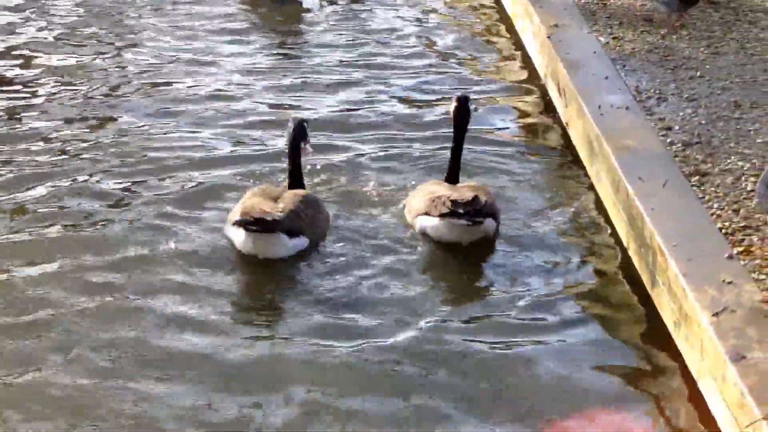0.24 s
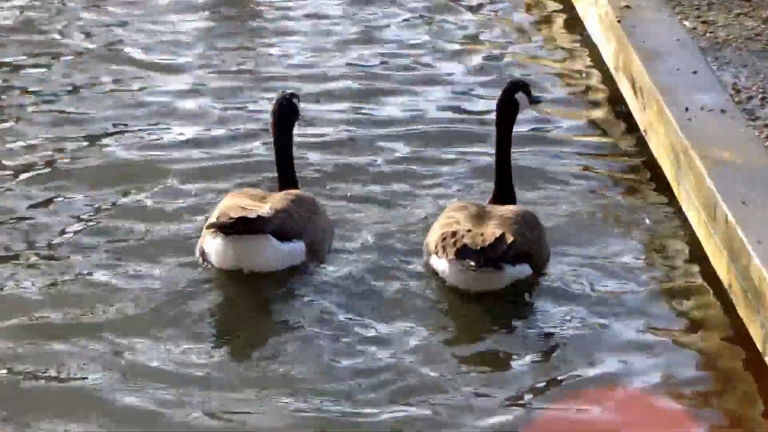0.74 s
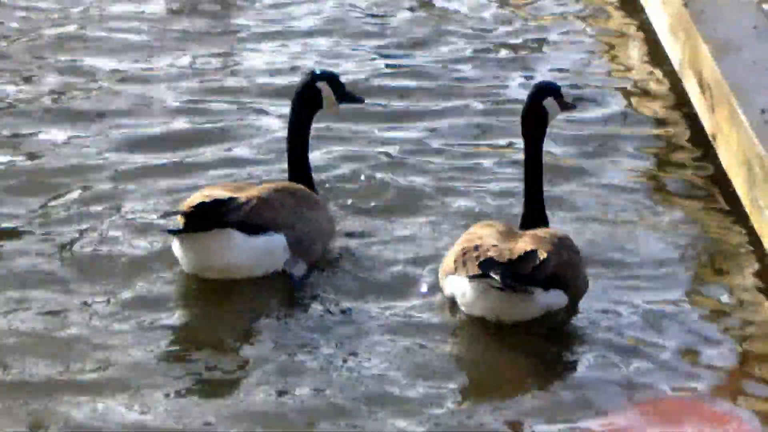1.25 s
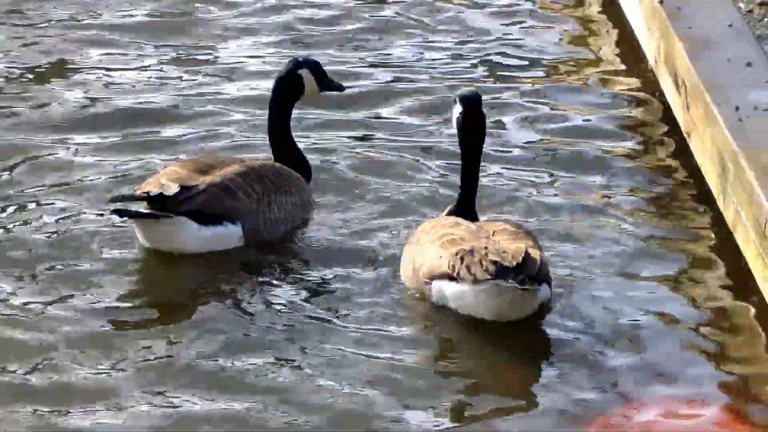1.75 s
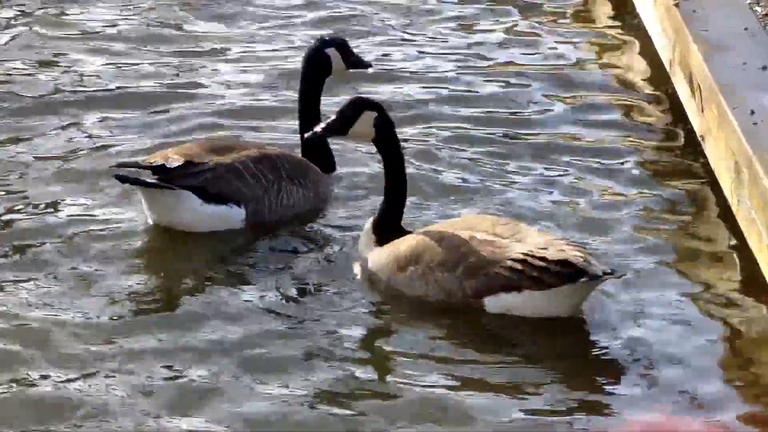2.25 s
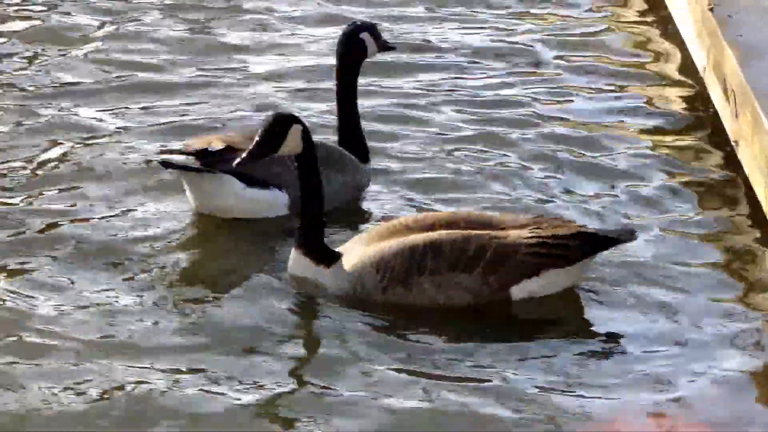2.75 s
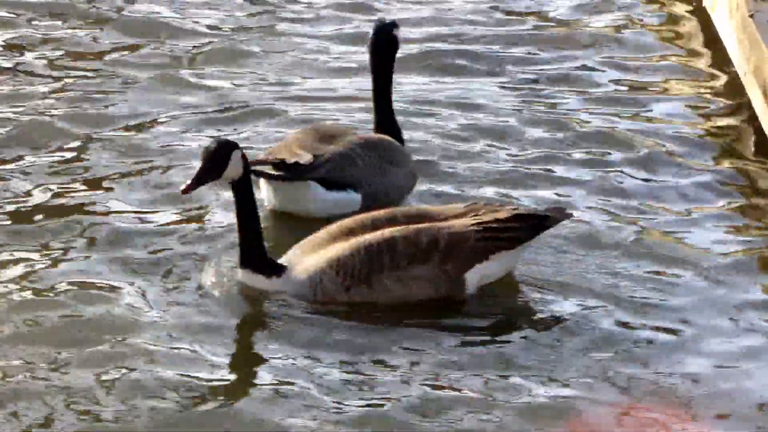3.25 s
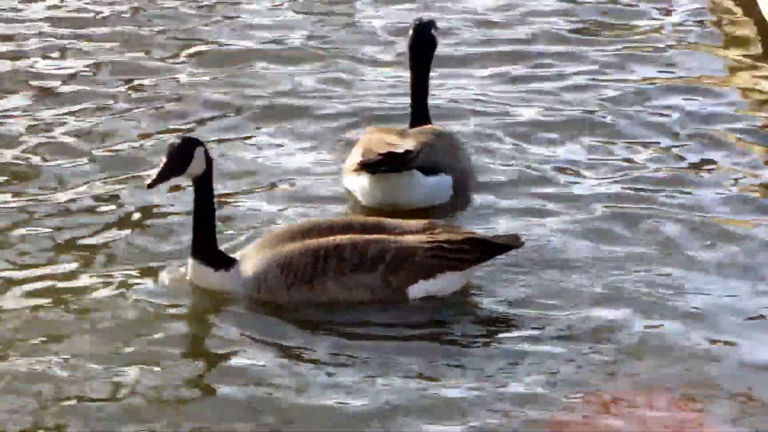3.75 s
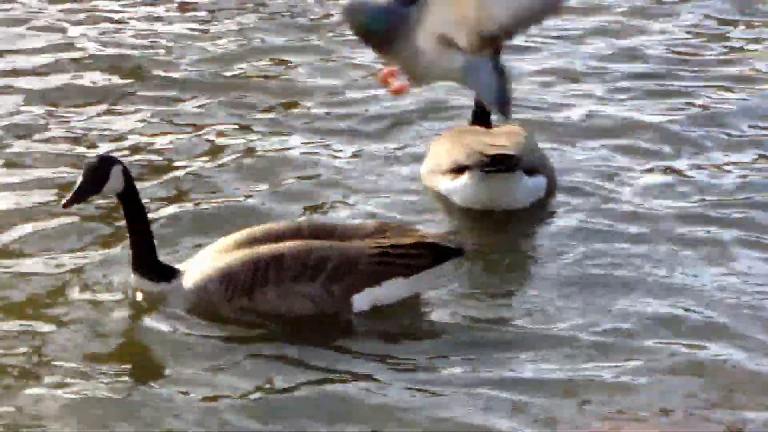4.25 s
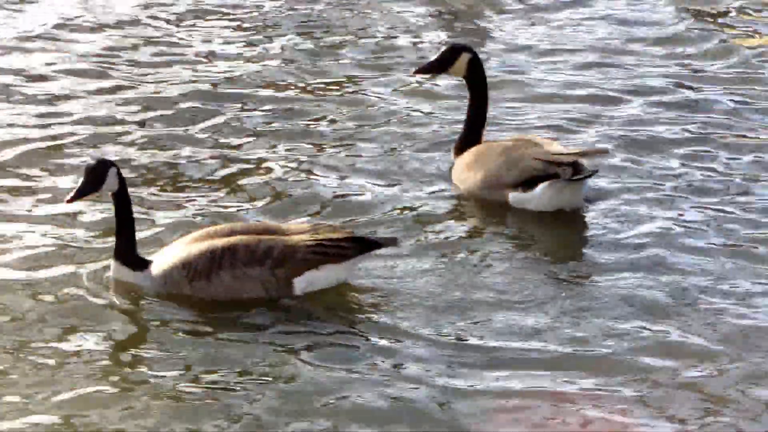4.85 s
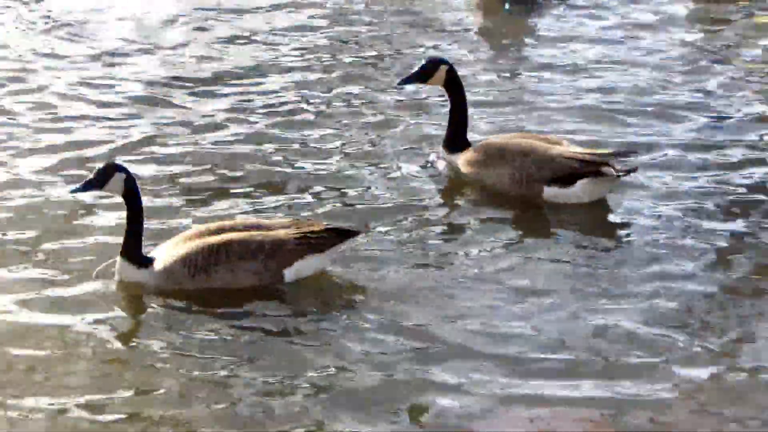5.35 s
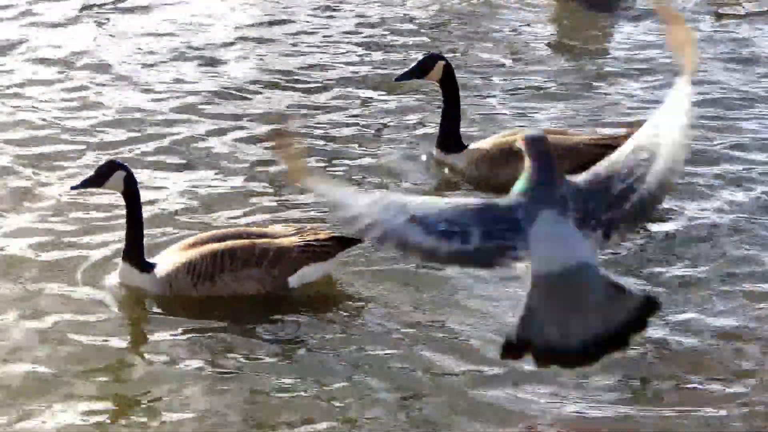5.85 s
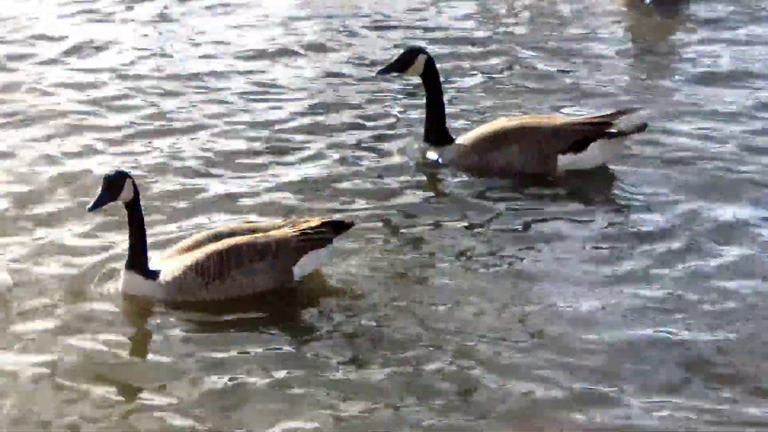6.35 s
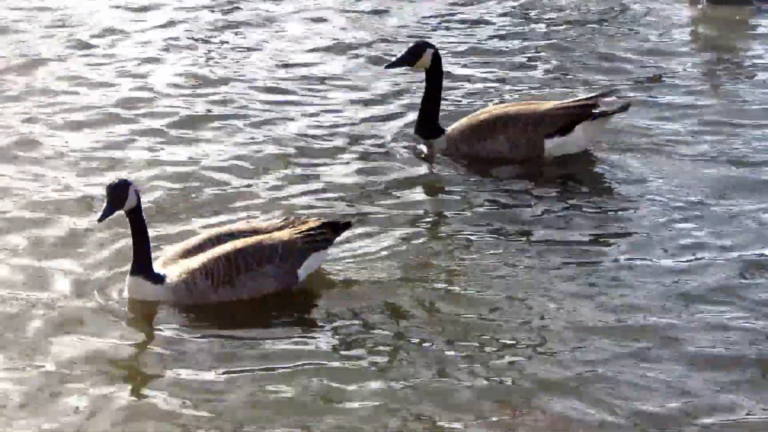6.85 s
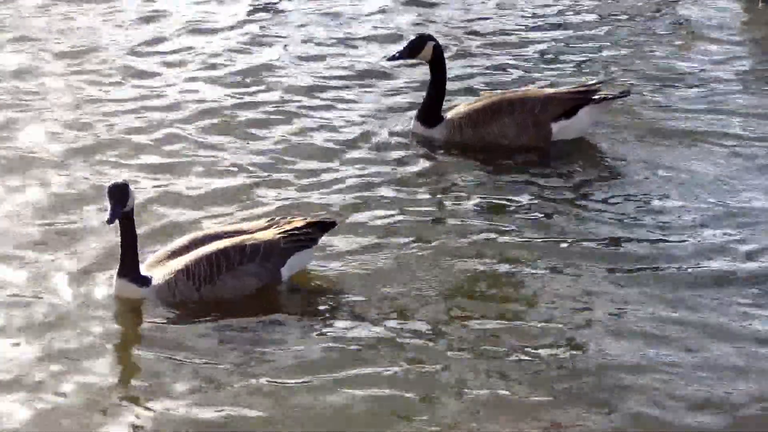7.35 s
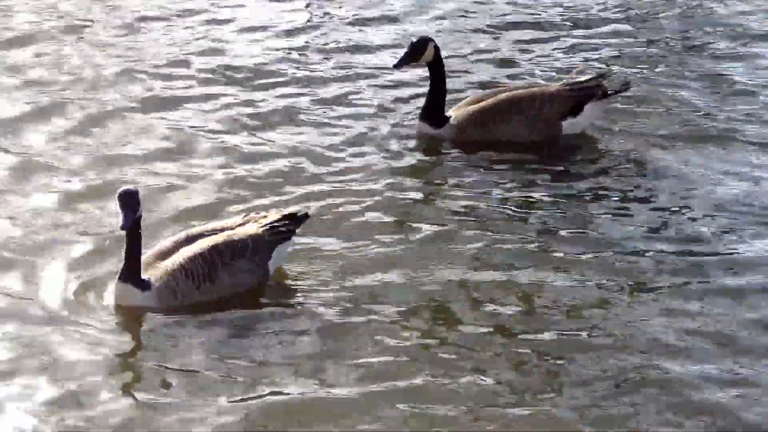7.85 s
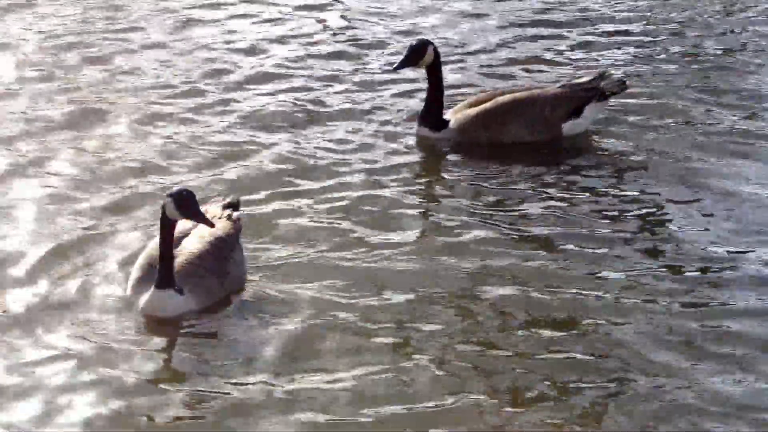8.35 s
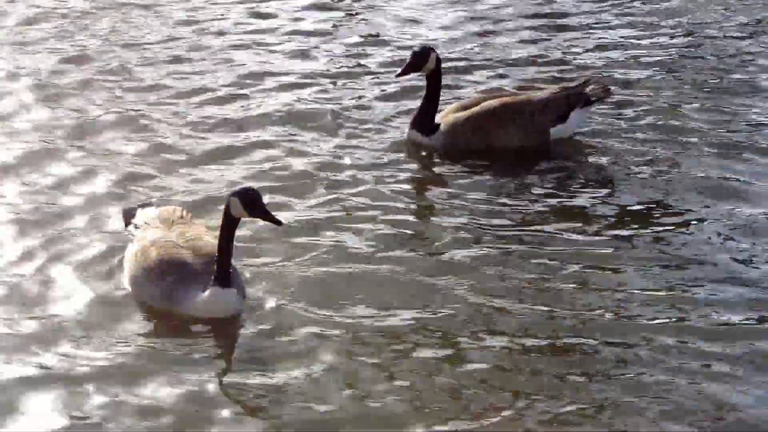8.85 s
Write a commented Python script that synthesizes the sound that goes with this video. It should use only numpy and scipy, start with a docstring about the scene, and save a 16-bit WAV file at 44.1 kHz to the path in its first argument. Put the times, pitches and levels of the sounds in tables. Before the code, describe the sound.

A close, dry outdoor sound of gravel under slow, shuffling feet on a path by a pond. From 0 to 1.5 seconds, light grinding and short gritty slips come quietly, with soft low bumps and tiny instants of silence. From about 1.6 the crunching thickens into irregular bursts, with sharp pebble clicks and hollow stone knocks near 2.5. A faint, hoarse pigeon coo lies behind at 2.5 to 3.1. Steady uneven crunching continues, with a bright snap at 3.9. From 4.8 it swells, loudest around 5.2 to 6, with heavy crunches, crackling hard snaps and a dull low thump near 5.6. After 6.5 it thins; a hollow knock and crunch come at 7.2, then light scrapes. After 8 only sparse ticks and slips remain over very faint open air, with a brief dropout near 8.9.

```python
"""Gravel crunches and shifts under slow feet on a pond-side path, close to the microphone.
Dense tiny contacts make the grinding; each slip is a short burst of grit that rings in the stones.
Single pebbles snap as hard clicks with brief chatter, loudest past the middle; large stones knock hollow.
Behind them are soft low bumps of filtered pushes, a faint pigeon's wavering tone and noise for the open air.
The sound cuts out for an instant a few times."""
import sys
import numpy as np
from scipy import signal
from scipy.io import wavfile
from scipy.ndimage import uniform_filter1d

SR = 44100
rng = np.random.default_rng(int(sys.argv[2]) if len(sys.argv) > 2 else 0)


def persist_wave(psi):
    """Save psi, clipped to +-1, as 16-bit WAV."""
    counts = np.round(np.clip(psi, -1, 1) * 32767).astype(np.int16)
    wavfile.write(sys.argv[1], SR, np.atleast_2d(counts).T)


N = 400869
TAPS = 2048  # filter length in samples
HZ = np.fft.rfftfreq(TAPS, 1 / SR)
TIME = np.arange(N) / SR
EDGE_HZ = 15900  # upper band limit

# relative colour of a pebble's snap and of small ticking chips: hz, density_db (dB per Hz)
SNAP_COLOUR = [(100, -16), (400, -20), (1100, -14), (4500, -6), (6500, -4.5), (9000, 0.5), (12000, -8.5),
               (16000, -8.5)]


def amp(db):
    """Amplitude factor for a level in dB."""
    return 10 ** (np.asarray(db) / 20)


def evened(x):
    """Scale to unit mean square."""
    return x / np.sqrt(np.mean(x ** 2) + 1e-20)


def colour(points):
    """Gain at each frequency from (Hz, dB) points, joined along log frequency."""
    hz, db = np.transpose(points)
    return amp(np.interp(np.log(HZ + 1), np.log(hz), db))


def add(mix, s, sound):
    """Add a sound into the mix from time s, cut off at the end."""
    part = mix[max(round(s * SR), 0):][:len(sound)]
    part += sound[:len(part)]


def filtered(x, gain):
    """Minimum-phase filter with the given gain: sharp attack, ringing afterwards."""
    log_gain = np.log(np.maximum(gain, 1e-5))
    circle = np.concatenate([log_gain, log_gain[-2:0:-1]])
    spectrum = np.exp(np.conj(signal.hilbert(circle)))
    return signal.oaconvolve(x, np.fft.ifft(spectrum).real)


def wander(length, step):
    """Random curve of unit mean square, with straight lines between knots every step points."""
    knots = np.arange(0, length + step, step)
    return evened(np.interp(np.arange(length), knots, rng.standard_normal(len(knots))))


def ring(hz, width, lift_db):
    """A resonance as a bump in gain (a hollow if negative); width is a share of its frequency."""
    return amp(lift_db / (1 + ((HZ - hz) / (width * hz / 2)) ** 2))


def grit(length, per_s, spread_db):
    """Tiny stone contacts: clicks at random moments, mostly small, a few large."""
    chance = rng.random(length)
    size = rng.exponential(1, length)
    sign = rng.choice([-1., 1.], length)
    return evened(sign * (chance < per_s / SR) * amp(spread_db * np.minimum(size, 4)))


def slip(length, onset=0.35, fall=0.86):
    """Quick swell and slower decay of one slip, peak 1; a smaller onset is more sudden."""
    u = np.arange(int(6 * length * SR) + 2) / (length * SR)
    swell = u ** abs(onset) * np.exp(-fall * u)
    return swell / swell.max()


def patchy(x, depth_db, size=512):
    """Ever new stones are in contact, so the colour changes in small patches of time and frequency."""
    overlap = size * 3 // 4
    z = signal.stft(x, nperseg=size, noverlap=overlap)[2]
    patches = uniform_filter1d(rng.standard_normal(z.shape), size=7, axis=0)
    patches = uniform_filter1d(patches, size=10, axis=1)
    return signal.istft(z * amp(depth_db * evened(patches)), nperseg=size, noverlap=overlap)[1][:len(x)]


def air(level_db=-59.0):
    """Faint steady outdoor noise: random pressure shaped by one fixed colour."""
    # relative colour of the open air: hz, density_db (dB per Hz)
    air_colour = [(10, 8.5), (25, 2.5), (60, -5), (120, -12.5), (220, -8.5), (310, -10), (450, 0.5),
                  (700, -8.5), (1500, -13.5), (5000, -8), (16000, -48)]
    return amp(level_db) * filtered(rng.standard_normal(N), evened(colour(air_colour)))[:N]


def pigeon(waver_hz=20.8):
    """A distant coo: one tone made hoarse by quick random wavering of pitch and level."""
    # path of the coo before its wavering: start_s, pitch_hz, level_db
    coo_path = [(2.44, 401, -80), (2.52, 405, -60), (2.63, 439, -57), (2.74, 442, -64), (2.84, 418, -58),
                (2.97, 406, -62), (3.1, 398, -76)]
    s, hz, db = np.transpose(coo_path)
    pitch = np.interp(TIME, s, hz) + waver_hz * wander(N, step=250)
    level = amp(np.interp(TIME, s, db, left=-140, right=-140))
    tone = np.sin(2 * np.pi * np.cumsum(pitch) / SR)
    return level * evened(tone * (1 + .5 * wander(N, step=310)))


def bumps(level_db=0., per_s=260, spread_db=2.0, ring_width=0.39, ring_db=11.0):
    """Each bump is one dull push and a dying stutter of random ones, with a hollow ring."""
    # soft low bumps: start_s, length_s (half the decay time constant), level_db, ring_hz
    bump_rows = [(0.074, .02, -60, 150), (.3, .02, -57.5, 180), (1.242, 0.034, -54.5, 170),
                 (1.284, .016, -56, 170), (1.288, .012, -45, 420), (1.375, .015, -55, 180),
                 (1.425, 0.013, -52.5, 382), (1.43, .012, -56, 200), (2.414, 0.019, -52.5, 205),
                 (3.42, 0.028, -60, 180), (5.463, 0.0011, -45, 110), (5.565, 0.00075, -32, 75),
                 (6.13, 0.011, -53.5, 110), (6.55, .031, -61, 130), (7.756, 0.014, -49, 215),
                 (7.763, 0.0091, -52, 400)]
    # relative colour of a bump: hz, density_db (dB per Hz)
    bump_colour = [(20, -20), (80, -10), (150, -5.5), (230, 0), (400, -0.5), (600, -1), (1500, -55),
                   (5000, -60)]
    t, out = np.arange(SR // 4) / SR, np.zeros(N)
    for s, length, db, hz in bump_rows:
        pushes = grit(len(t), per_s, spread_db)
        pushes[0] = abs(pushes).max() / 2
        pushes *= np.exp(-t / length / 2)
        pushes *= np.sqrt(np.e / 2 * length * SR) / np.linalg.norm(pushes)  # energy grows with length
        gain = evened(colour(bump_colour) * ring(hz, ring_width, ring_db))
        add(out, s, amp(db) * filtered(pushes, gain))
    return amp(level_db) * out


def underfoot(t):
    """Levels in dB of scrape, crunch and fizz at times t: the slow swell, lifted while a foot presses."""
    # grinding between steps, swelling as the feet come near: start_s, scrape_db, crunch_db, fizz_db
    swell_path = [(0, -55.5, -53.5, -53), (1, -60.5, -53, -53.5), (1.33, -55, -57.5, -56.5),
                  (1.6, -60, -49, -47.5), (2, -54, -52, -50.5), (2.45, -56.5, -54, -50.5),
                  (3, -54.5, -49, -49), (4.73, -55.5, -48.5, -48), (5, -51, -43, -38.5),
                  (5.45, -47.5, -42.5, -38.5), (5.8, -51, -47.5, -42), (6.5, -53.5, -48, -44),
                  (7.7, -58, -56, -49.5), (8.3, -59, -57.5, -51.5), (9.09, -59, -58, -56.5)]
    # steps or shuffles pressing the gravel: start_s, load_s, scrape_lift_db, crunch_lift_db, fizz_lift_db
    step_rows = [(.07, 0.12, 1, 1, 3), (.36, 0.094, 2.5, -0.5, 2.5), (.61, 0.27, 6, 2, 4.5),
                 (1.04, 0.21, 1.5, 4, 6), (1.59, 0.16, 2.5, 0.5, 1), (2.04, 0.24, 2.5, 4.5, 3.5),
                 (2.54, 0.12, 9, 6, 3.5), (2.71, 0.095, -0.5, 6.5, 8), (3.11, 0.2, 2.5, 3, 3.5),
                 (3.53, 0.12, -3, 2.5, 5), (3.81, 0.13, 0, 1.5, 4), (4.19, 0.035, 0, -2, 4),
                 (4.36, .27, 0.5, 1.5, 3.5), (4.78, 0.05, 5.5, 2, 5.5), (5.16, 0.14, 3, 1, 1),
                 (5.56, 0.079, 1, -1, -1), (6.02, .17, -0.5, 3.5, 4), (6.72, 0.091, 2, 3.5, -3),
                 (7.15, 0.2, 4, 0, -2.5), (7.5, 0.1, 0, 2.5, 3), (7.8, 0.2, 3.5, 2, -0.5),
                 (8.56, 0.2, 0, 3, 5)]
    press_s, release_s = 0.039, 0.092  # a foot's weight comes on, then comes off
    s, *levels = np.transpose(swell_path)
    db = np.array([np.interp(t, s, level) for level in levels])
    for start, length, *lifts in step_rows:
        pressing = (t - start) / press_s
        releasing = 1 - (t - start - length) / release_s
        load = np.clip(np.minimum(pressing, releasing), 0, 1)
        db += np.outer(lifts, load)
    return db


def registers():
    """The gravel's colour split into low scrape, mid crunch and high fizz, each of unit power."""
    # relative colour of the gravel: hz, density_db (dB per Hz)
    gravel_colour = [(100, -25), (310, -18), (420, -12), (560, -6.5), (690, -1), (1150, -6.5), (1650, -8.5),
                     (1950, -2.5), (2380, -2.5), (3000, -3.5), (5800, -5.5), (8800, -1.5), (11800, -13),
                     (16000, -14.5)]
    scrape_top_hz, crunch_top_hz = 1500, 5000
    above_scrape = 1 / (1 + (scrape_top_hz / (HZ + 1)) ** 10)
    above_crunch = 1 / (1 + (crunch_top_hz / (HZ + 1)) ** 10)
    shares = [1 - above_scrape, above_scrape - above_crunch, above_crunch * (HZ < EDGE_HZ) + 1e-6]
    return np.array([evened(colour(gravel_colour) * np.sqrt(share)) for share in shares])


def grinding(levels, level_db=(-.3, -1., -.6), flutter_db=(1.5, 1.7, 1.6),
             per_s=9000, spread_db=4.0, patchy_db=1.9):
    """Dense contacts at an uneven strength, heard as scrape, crunch and fizz."""
    contacts = evened(patchy(grit(N, per_s, spread_db), patchy_db))
    pace, out = wander(N, step=300), np.zeros(N)  # the pace is common to all three registers
    for band, db, trim_db, depth_db in zip(registers(), levels, level_db, flutter_db):
        flutter = evened(pace + wander(N, step=500))
        out += amp(db + trim_db + depth_db * flutter) * filtered(contacts, band)[:N]
    return out


def ticks(fizz_db, level_db=-7.5, per_s=120, spread_db=3.5, ring_width=0.45, ring_db=13.5, count=16):
    """Small chips tick at random inside the grinding, each size at its own pitch."""
    out = np.zeros(N)
    for hz in np.geomspace(2500, 12000, count):
        chip = evened(colour(SNAP_COLOUR) * ring(hz, ring_width, ring_db))
        out += filtered(grit(N, per_s / count, spread_db), chip)[:N]
    return amp(level_db + fizz_db) * evened(out)


def knocks(t60=0.048, ring_width=0.2, ring_db=8.0):
    """A large stone rocks against its neighbours: a short rattle in one low resonance."""
    # larger stones knocking with a hollow note: start_s, level_db, ring_hz
    knock_rows = [(2.541, -37, 1250), (2.572, -44, 1250), (2.62, -43, 1210), (3.335, -46, 703),
                  (3.927, -44, 1420), (4.591, -37, 1210), (5.2, -35, 780), (7.178, -35, 657)]
    t, out = np.arange(TAPS) / SR, np.zeros(N)
    for s, db, hz in knock_rows:
        rattle = rng.standard_normal(TAPS) * amp(-60 * t / t60)
        add(out, s, amp(db) * filtered(rattle, evened(ring(hz, ring_width, ring_db) - 1)))
    return out


def snaps(level_db=0., ring_width=0.2, ring_db=8.0, patchy_db=3.5, chatter=0.93, thin_below_hz=270.0):
    """A hard first contact, then about a millisecond of chatter, ringing at the pebble's pitch."""
    # pebbles snapping hard on one another: start_s, level_db, ring_hz, top_treble_lift_db
    snap_rows = [(0.8196, -27, 8100, -6), (1.1864, -27.5, 7000, -1), (1.6526, -30, 8600, -6),
                 (1.7016, -32, 7350, -1), (1.8593, -31.5, 9800, 7), (1.9888, -27.5, 7100, -1),
                 (2.1448, -33, 9700, 7), (3.1138, -29.5, 7000, -2), (3.5794, -29, 8700, -6),
                 (3.9267, -20, 9400, 15), (4.4187, -30, 13400, 4), (4.9478, -24, 8400, -5),
                 (5.462, -18.5, 8200, 1), (5.5672, -17, 8800, 1), (5.6237, -18, 9250, 3.5),
                 (5.8338, -20.5, 7950, 3), (5.8378, -18.5, 7000, -12), (5.947, -15.5, 6960, -9),
                 (5.9511, -26, 7460, -6), (6.3058, -22, 8400, -6), (6.327, -21.5, 8100, 0),
                 (6.4535, -32, 6300, 0), (6.528, -24, 9400, 0), (6.556, -30, 8500, 0),
                 (7.1815, -28, 8900, 18), (8.254, -27, 9800, -8), (8.588, -32, 8440, -11),
                 (8.983, -32, 8400, -6)]
    chatter_s, top_treble_hz = 0.0012, 11000  # decay time constant; where the top treble begins
    t, out = np.arange(TAPS // 2) / SR, np.zeros(N)
    top = 1 / (1 + (top_treble_hz / (HZ + 1)) ** 20)
    thinning = (HZ + 1) / np.hypot(HZ, thin_below_hz)
    for s, db, hz, top_db in snap_rows:
        blow = rng.standard_normal(len(t)) * np.exp(-t / chatter_s)
        blow *= chatter / np.linalg.norm(blow)
        blow[0] = 1  # the first contact
        blow *= np.sqrt(np.e / 2 * chatter_s * SR) / np.linalg.norm(blow)  # same energy for every blow
        unevenness = amp(top_db * top + patchy_db * wander(len(HZ), step=20))
        pebble = colour(SNAP_COLOUR) * ring(hz, ring_width, ring_db) * unevenness
        add(out, s, amp(db) * filtered(blow, evened(pebble * thinning)))
    return amp(level_db) * out


def small_slips(over_db=(0., 5.5, 4.), scatter_db=2., tilt_db=3.5, length_s=0.0051, ring_hz=2660.0,
                until_s=8., count=90):
    """Lesser slips at random while the feet move, set around the grinding's level; rows as for loud slips."""
    s = (np.arange(count) + rng.random(count)) * until_s / count
    size, tilt, length, pitch = np.clip(rng.standard_normal((count, 4)), -2, 2).T
    levels = underfoot(s) + np.array(over_db)[:, None]
    levels = levels + scatter_db * size + tilt_db * np.outer([-1, 0, 1], tilt)
    return list(zip(s, length_s * np.exp(.6 * length), *levels, ring_hz * np.exp(.18 * pitch)))


def crunches(level_db=0., per_s=6000, spread_db=3.5, ring_width=0.3, ring_db=8.0, patchy_db=2.0):
    """A slip sets off a burst of contacts that ring in the stones around it."""
    # loud slips of stones: start_s, length_s (time scale of the swell), scrape_db, crunch_db, fizz_db, ring_hz
    loud_slips = [(0.107, .018, -47, -45.5, -46, 1970), (0.272, 0.0027, -55, -47, -49, 2300),
                  (0.381, .015, -50, -45.5, -53, 2100), (0.422, 0.0036, -53, -43, -38.5, 2690),
                  (.65, 0.016, -63, -42.5, -40, 2200), (.71, 0.0029, -45, -39, -48, 3750),
                  (.818, 0.0042, -49, -34, -37, 3200), (.937, .0036, -55.5, -39.5, -63, 2180),
                  (1.038, .004, -61, -46, -44, 2200), (1.181, 0.014, -58, -42, -35, 3260),
                  (1.406, 0.011, -59, -59, -45, 3020), (1.375, 0.0036, -60, -59, -39.5, 3000),
                  (1.652, 0.002, -57, -38, -42, 2700), (1.684, 0.025, -58, -38.5, -40.5, 2600),
                  (1.749, 0.0042, -48, -31, -35.5, 2600), (1.835, 0.0099, -43, -41.5, -42, 2500),
                  (1.988, 0.01, -48, -40, -40.5, 2400), (2.039, 0.012, -58, -36.5, -82, 2240),
                  (2.063, 0.011, -67, -56, -40.5, 2000), (2.162, 0.0011, -53, -30, -38, 2020),
                  (2.211, .013, -45, -39, -52, 2000), (2.243, 0.023, -62, -57, -39, 2300),
                  (2.427, 0.0015, -55, -35, -38, 2930), (2.54, 0.0029, -41, -27.5, -43, 2480),
                  (2.659, .01, -44, -41, -42, 2000), (2.693, 0.0089, -63, -37, -40.5, 2780),
                  (2.75, .03, -64, -66, -47, 2000), (2.869, .005, -54, -34, -35, 3300),
                  (2.945, 0.017, -47, -40, -41.5, 3000), (2.982, 0.0045, -54, -33, -34, 3500),
                  (3.078, 0.011, -50, -35.5, -38, 3400), (3.168, 0.0085, -46, -38.5, -44, 2270),
                  (3.249, 0.0034, -56, -28.5, -34.5, 2750), (3.332, 0.0034, -43, -30.5, -48, 2450),
                  (3.363, 0.0027, -40.5, -41, -33, 2300), (3.483, 0.018, -57, -45, -35, 3930),
                  (3.554, 0.0036, -50, -40, -33.5, 2500), (3.622, 0.0056, -50.5, -37, -40, 3350),
                  (3.713, 0.015, -61, -43, -38, 4280), (3.788, 0.0033, -49, -32.5, -46, 2530),
                  (3.924, .0015, -46, -38, -50, 1400), (3.969, 0.0053, -54, -40, -43, 2920),
                  (4.032, 0.012, -50, -47, -55, 1900), (4.121, 0.0084, -40.5, -34, -41, 2300),
                  (4.207, 0.0055, -62, -44.5, -41.5, 2160), (4.263, 0.0055, -54, -42.5, -39.5, 3340),
                  (4.392, 0.011, -50, -42, -43, 2700), (4.451, 0.005, -46, -37.5, -44, 2700),
                  (4.474, 0.0097, -46.5, -35.5, -36, 2460), (4.56, 0.019, -46, -39, -31.5, 2500),
                  (4.639, 0.0076, -62, -31, -36, 2470), (4.723, 0.0061, -60, -58, -34, 1900),
                  (4.825, 0.016, -46, -38, -39, 2440), (4.85, 0.0068, -39, -30, -32, 2470),
                  (4.909, 0.004, -46, -35, -31, 3030), (5.037, 0.014, -44, -33.5, -33.5, 2410),
                  (5.136, 0.01, -45, -33, -41, 2500), (5.183, 0.018, -39.5, -35.5, -40, 2420),
                  (5.254, 0.0045, -41, -23.5, -27.5, 2330), (5.307, 0.015, -38.5, -30, -33.5, 2400),
                  (5.369, .006, -53, -39, -30.5, 3230), (5.565, .0012, -35, -34, -40, 1600),
                  (5.583, 0.0048, -37.5, -36, -40, 2400), (5.607, 0.011, -47, -46, -40, 2200),
                  (5.663, 0.02, -46, -39.5, -31.5, 2250), (5.786, 0.0089, -49, -36.5, -37, 2420),
                  (5.931, 0.0076, -57, -37.5, -40, 2130), (6.013, 0.0097, -44.5, -32, -29.5, 3720),
                  (6.13, 0.011, -55, -35, -36, 3170), (6.236, .0037, -55, -49, -36, 2800),
                  (6.475, .0032, -61, -44, -53, 3000), (6.611, 0.0058, -59, -33, -31, 2660),
                  (6.737, .0042, -56, -37.5, -49, 2330), (6.805, 0.013, -41, -39, -42, 2180),
                  (7.172, 0.0098, -41, -31.5, -36, 2340), (7.278, 0.014, -45, -44, -44.5, 2320),
                  (7.744, .018, -56, -49.5, -42, 3800), (7.822, 0.014, -42.5, -44.5, -61, 2270),
                  (7.849, 0.0024, -45, -44, -29.5, 1300), (7.93, 0.022, -58, -45, -43, 2410),
                  (8.258, 0.0063, -57, -48.5, -33, 3400), (8.588, .0034, -62, -54, -37, 3800)]
    bands, out = registers(), np.zeros(N)
    for s, length, *levels, hz in loud_slips + small_slips():
        swell = slip(length)
        contacts = grit(SR // 2, per_s, spread_db)[:len(swell)]
        burst = evened(contacts * swell) * np.sqrt(np.mean(swell ** 2))
        dullness_db = max(levels[1] - levels[2], 0)  # a slip with little fizz rings more clearly
        unevenness = amp(patchy_db * wander(len(HZ), step=16))
        stones = ring(hz, ring_width, ring_db + .25 * dullness_db) * unevenness
        power = sum((amp(db) * evened(band * stones)) ** 2 for band, db in zip(bands, levels))
        add(out, s, filtered(burst, np.sqrt(power)))
    return amp(level_db) * out


def ground(x, wet_db=-17.5, t60=0.098):
    """The path and the pond's kerb scatter a short, weak tail."""
    t = np.arange(SR // 4) / SR
    tail = rng.standard_normal(len(t)) * amp(-60 * t / t60) * (t > .002)
    return x + amp(wet_db) * signal.oaconvolve(x, tail / np.linalg.norm(tail))[:N]


def scene():
    """Gravel under the feet, low bumps, a pigeon and the open air."""
    levels = underfoot(TIME)
    fizz_db = levels[2]
    single_stones = crunches() + knocks() + snaps() + ticks(fizz_db)
    stones = grinding(levels) + ground(single_stones)
    return (stones + bumps() + pigeon() + air())[None]


def record(dry):
    """The microphone's colour, brief dropouts, and the band limit."""
    # narrow hollows in the microphone's colour: centre_hz, width (share of the frequency), depth_db
    mic_hollows = [(308.5, 0.23, -6.5), (899, 0.088, -12)]
    # the sound cuts out: start_s, end_s, depth_db
    cut_rows = [(0.038, 0.06, -37), (.126, 0.131, -23), (0.251, 0.272, -37.5), (0.433, 0.443, -21),
                (1.203, 1.2073, -23), (1.288, 1.298, -27), (1.463, 1.468, -30), (2.409, 2.421, -36),
                (8.847, 8.882, -41)]
    heard = filtered(dry[0], np.prod([ring(*hollow) for hollow in mic_hollows], axis=0))[:N]
    cut_db = sum(depth * ((TIME > start) & (TIME < end)) for start, end, depth in cut_rows)
    heard = heard * amp(uniform_filter1d(cut_db, size=40))  # slopes of about a millisecond
    band_limit = signal.firwin(511, EDGE_HZ, window=("kaiser", 9), fs=SR)
    return signal.oaconvolve(heard, band_limit, "same")[None]


dry = scene()
out = record(dry)
persist_wave(out)
```